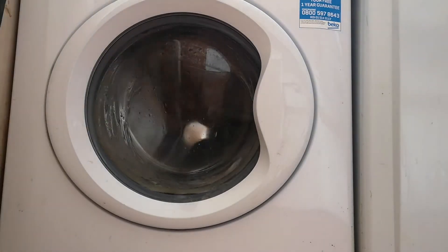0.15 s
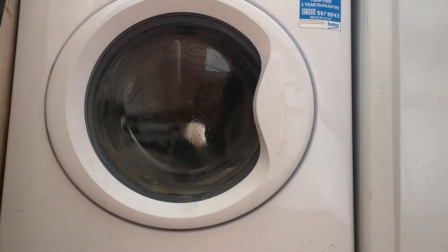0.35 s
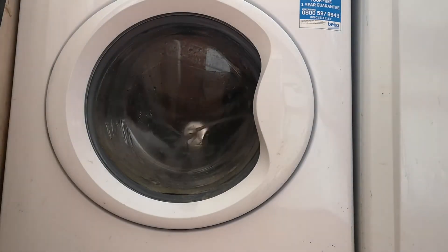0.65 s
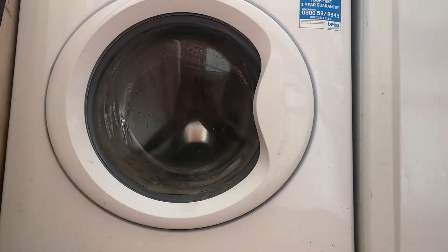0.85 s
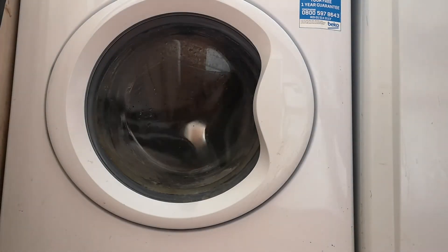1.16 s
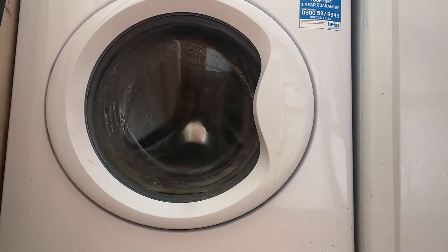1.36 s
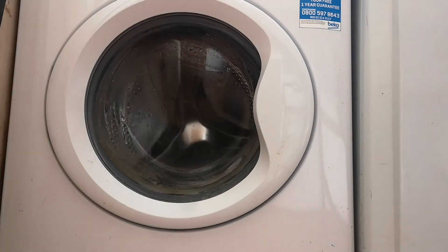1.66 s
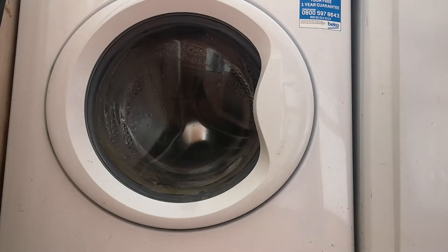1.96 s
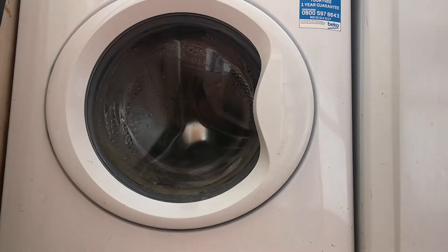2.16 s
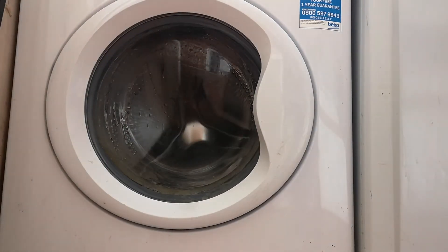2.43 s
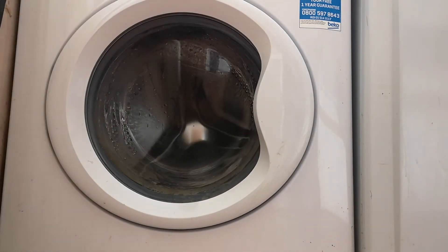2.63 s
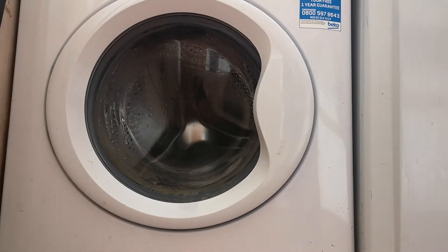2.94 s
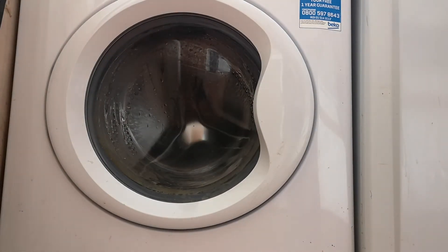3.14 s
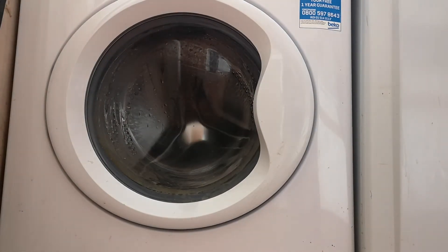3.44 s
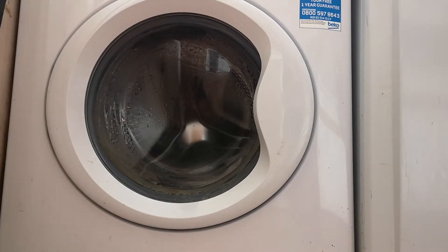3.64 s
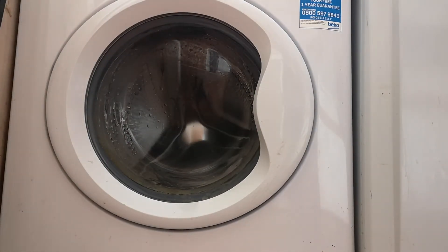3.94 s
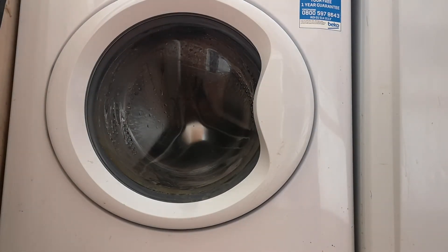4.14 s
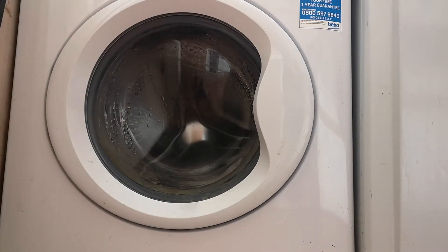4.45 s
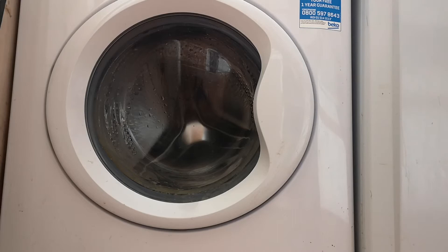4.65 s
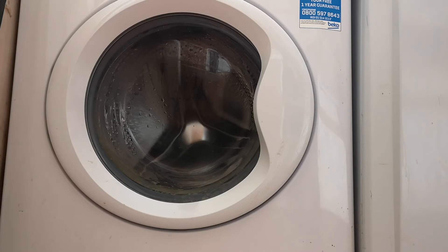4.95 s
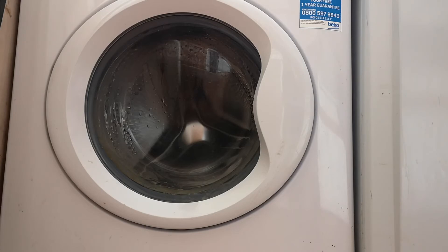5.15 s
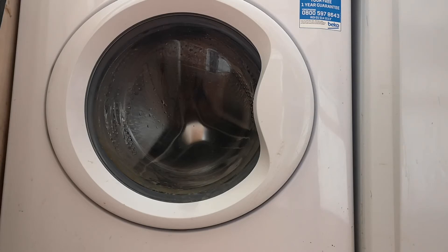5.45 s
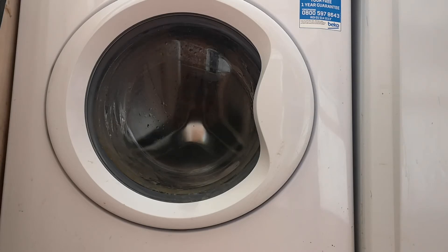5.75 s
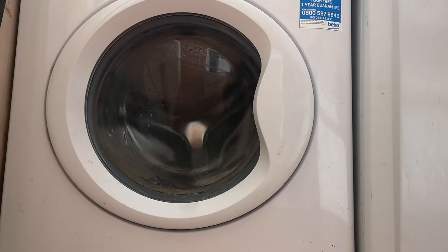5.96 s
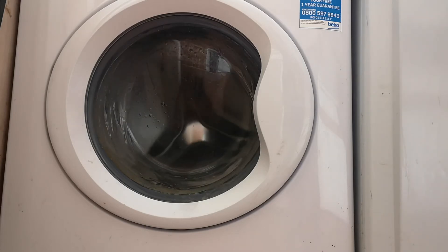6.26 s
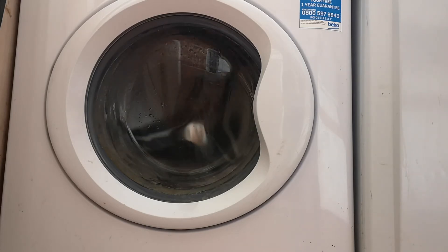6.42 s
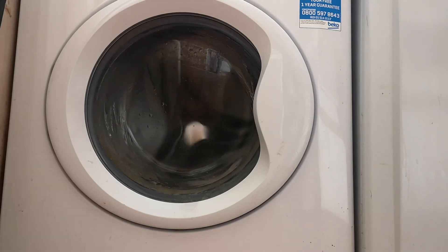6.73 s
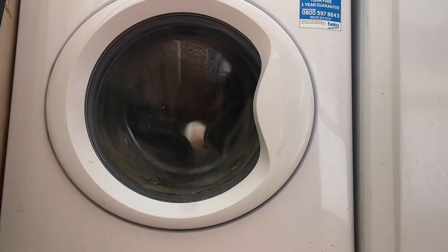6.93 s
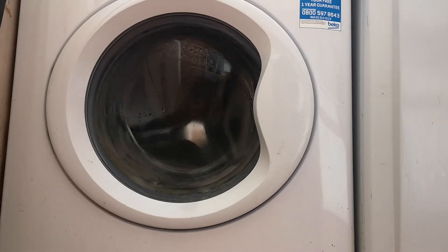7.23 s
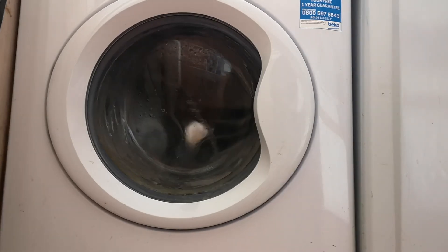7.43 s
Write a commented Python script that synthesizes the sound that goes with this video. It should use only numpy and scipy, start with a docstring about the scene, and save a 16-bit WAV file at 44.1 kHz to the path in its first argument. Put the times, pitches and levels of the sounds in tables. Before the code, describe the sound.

Close washing machine: pulsing motor boom and hiss, hard knocks in the drum, a coasting stop, near silence, a lurch, then harsh squeal and steady turning again.

```python
"""A washing machine motor turns its drum, coasts to a stop, rests and starts up the other way.
Each shaft turn is an impulse on the cabinet, whose modes boom; the brushes make noise that swells and ticks.
Under strain, stick-slip noise sings in the housing resonances. Loose things knock in the drum as damped sines.
The tub sways and lurches on its springs; a hum of steady harmonics and the hush of the home fill the rest."""
import sys
import numpy as np
from scipy import signal
from scipy.io import wavfile
from scipy.ndimage import uniform_filter1d

SR = 44100
rng = np.random.default_rng(int(sys.argv[2]) if len(sys.argv) > 2 else 0)


def to_linear_factor(level_db):
    """Convert decibel levels (scalar or array-like) to linear amplitude factors."""
    exponent = np.asarray(level_db, float) / 20
    return 10 ** exponent


def put_to_file(sound):
    """Save the sound as 16-bit audio at rate SR, in the file named by the first command-line argument."""
    columns = np.atleast_2d(sound).T  # one column per channel
    safe = np.clip(columns, -1, 1)
    whole_steps = np.round(safe * 32767)
    wavfile.write(sys.argv[1], SR, whole_steps.astype(np.int16))


N = 334719
TIME = np.arange(N) / SR

REVERSE_S = 3.7   # within the rest: settings for turning forward hold before it, for turning back after it
FIRST_JOLT_S = 4.364   # the motor starts backwards
STEADY_HZ, STEADY_DB = (270, 330), -43   # tones and panels in this range stop growing above this load


def rms_one(x):
    """Normalization: scales to unit rms."""
    return x / np.sqrt(np.mean(x ** 2) + 1e-20)


def at_hz(points, hz):
    """Spectral envelope: interpolates levels linearly over log frequency."""
    point_hz, value = np.transpose(points)
    return np.interp(np.log(hz), np.log(point_hz), value)


def drift(rate_hz):
    """Low-pass noise: two equal poles at the given rate make a slow random curve of spread 1."""
    hop = 40   # samples between the points of the slow curve
    r = np.exp(-2 * np.pi * rate_hz * hop / SR)
    white = rng.standard_normal(N // hop + 2002)
    slow = signal.lfilter([1], [1, -2 * r, r * r], white)[2000:]
    return np.interp(np.arange(N) / hop, np.arange(len(slow)), rms_one(slow))


def resonate(x, hz, width_hz):
    """Damped resonance: a pole pair of gain 1 at its peak."""
    r = np.exp(-np.pi * width_hz / SR)
    zeros = [(1 - r * r) / 2, 0, (r * r - 1) / 2]
    poles = [1, -2 * r * np.cos(2 * np.pi * hz / SR), r * r]
    return signal.lfilter(zeros, poles, x + 1e-18)


def resonate_twice(x, hz, width_hz, second):
    """Cascaded resonance: a second stage, its width scaled by the given factor, steepens the skirts."""
    return resonate(resonate(x, hz, width_hz), hz, second * width_hz)


def wandering(cycles, width_hz):
    """Phase diffusion: two unrelated sines of rms 1 whose random-walk phases spread the line to a width."""
    steps = rng.standard_normal((2, N // 16 + 2)) * np.sqrt(32 * np.pi * width_hz / SR)
    walk = np.repeat(np.cumsum(steps, axis=1), 16, axis=1)[:, :N]
    return np.sqrt(2) * np.sin(2 * np.pi * cycles + walk)


# Interchannel coherence. Each row: frequency in Hz, correlation of left with right.
LIKENESS = [(60, 1.0), (180, 0.98), (550, -0.4), (1650, -0.06), (4970, 0.09), (15000, -0.0)]
# Interchannel balance. Each row: frequency in Hz, left over right in dB.
BALANCE = [(60, 0.0), (180, 0.0), (550, -0.5), (1650, -0.5), (4970, 0.0), (9000, -2.5), (12000, -8.0),
           (15000, -12.0)]


def placed(pair, hz):
    """Mid-side synthesis: two signals become left and right with the coherence and balance of their pitch."""
    alike = np.clip(at_hz(LIKENESS, hz), -1, 1)
    lean_db = at_hz(BALANCE, hz) / 2
    mid, side = np.sqrt(1 + alike) * pair[0], np.sqrt(1 - alike) * pair[1]
    return (mid + side * [[1], [-1]]) * to_linear_factor(np.array([[lean_db], [-lean_db]]))


def banded_noise(spectrum, patchy_db, beat_db=0, step=1 / 3):
    """Filter-bank noise of rms 1: bands of step octaves flicker singly and in part together."""
    out, together = 0, drift(1.05)
    bottom_hz, top_hz = spectrum[0][0], spectrum[-1][0]
    edges = bottom_hz * 2 ** np.arange(0, np.log2(top_hz / bottom_hz) + step, step)
    white = rng.standard_normal((2, 2, N))
    for k, (low, high) in enumerate(zip(edges, np.minimum(edges[1:], 19000))):
        band_filter = signal.butter(2, [low, high], "band", fs=SR, output="sos")
        band = signal.sosfilt(band_filter, white[k % 2])
        hz = np.sqrt(low * high)
        bite = np.clip(np.log2(hz / 400) / 4, 0, 1)   # the beat bites deeper in the treble
        flicker_db = patchy_db * (0.45 * together + drift(15.3))
        out = out + to_linear_factor(at_hz(spectrum, hz) + flicker_db + bite * beat_db) * placed(band, hz)
    return rms_one(out)


def by_direction(forward, back):
    """Piecewise setting: one value while turning forward, another while turning back."""
    return np.where(TIME < REVERSE_S, forward, back)


def turning(turns, full_speed, power, smooth):
    """Speed-dependent excitation: grows from 0 at rest to 1 at full_speed (turns per s)."""
    share = np.clip(np.gradient(turns) * SR / full_speed, 0, 1)
    return uniform_filter1d(share ** power, size=smooth)


def peaks_db(rows, rise_db_per_s):
    """Exponential envelopes: the loudest of several (start s, hold s, dB, fade dB per s) at each moment."""
    shapes = []
    for start, hold, db, fade in rows:
        before, after = (start - TIME).clip(0), (TIME - start - hold).clip(0)
        shapes.append(db - rise_db_per_s * before - fade * after)
    return np.max(shapes, axis=0)


def shaft():
    """Rotational kinematics: steady speed, uniform braking, rest, then an exponential run-up backwards."""
    start_turns, speed, off_s, braking = .54, 15.37, 2.33, 22   # turns, turns per s, s, turns per s per s
    coast = np.clip(TIME - off_s, 0, speed / braking)
    forward = start_turns + speed * (np.minimum(TIME, off_s) + coast) - braking * coast ** 2 / 2
    speed, lost_turns, rise_s = 15.5, 1.15, .14   # turns per s, turns lost in the run-up, its time constant
    since = np.maximum(TIME - FIRST_JOLT_S, 0)
    whole = np.ceil(forward[-1])   # the run-up begins on a whole turn
    back = whole + speed * since - lost_turns * (1 - np.exp(-since / rise_s))
    return np.where(TIME < FIRST_JOLT_S, forward, back)


def brush_beat(turns, depth_db, tick_db, jump):
    """Periodic modulation, level over one turn: a round swell, in part a fading jump, and three short ticks."""
    angle = turns % 1
    strength = np.array([1, .6, .3])[(3 * angle).astype(int)]   # the first tick is the strongest
    ticks = np.exp(-(3 * angle % 1) / 0.034) * strength
    uneven = np.clip(1 + 0.4 * drift(23.5), 0, 2)
    swell = jump * (.5 - angle) + (1 - jump) * np.cos(2 * np.pi * (angle - 0.03)) / 2
    beat_db = depth_db * swell + tick_db * ticks * uneven
    return uniform_filter1d(beat_db, size=150)   # the room rounds each jump


# Cabinet modes. Each row: frequency in Hz, width in Hz, level turning forward in dB, level turning back in dB.
CABINET_MODES = [(46, 8, -10, -14), (62, 10, -5, -5), (77, 10, -2, -4), (92, 10, -2, -1), (108, 10, -3, -5),
                 (124, 10, -11, -13), (139, 10, -17, -19), (154, 10, -11, -17), (170, 10, -8, -14),
                 (185, 10, -16, -23), (200, 12, -24, -38), (231, 10, -33, -35), (262, 30, -37, -34),
                 (345, 70, -46, -39), (292, 12, -32, -40), (308, 10, -27, -24)]
# Rumble of moving water. Each row: frequency in Hz, level in dB per Hz.
WATER_RUMBLE = [(42, -15), (62, -2), (100, 6), (140, -8), (200, -21), (260, -48)]


def boom(turns, boom_db, lurch_db, load_db):
    """Modal excitation: each uneven jolt of the shaft rings the cabinet modes, over a rumble of moving water."""
    uneven, out = to_linear_factor(.7 * drift(8.0)), 0
    for hz, width_hz, forward_db, back_db in CABINET_MODES:
        # higher panels are shaken at ever earlier shaft angles, so each thump sweeps downward;
        # above 270 Hz all share one lead
        lead_turns = .00175 * hz if hz < 270 else .57
        # the lowest mode is pushed the opposite way when the shaft turns forward
        push = by_direction(-uneven, uneven) if hz < 50 else uneven
        jolts = np.diff(np.floor(turns - .57 + lead_turns), prepend=0).clip(0, 1) * push
        level_db = by_direction(forward_db, back_db) + 1.3 * drift(2.0)
        if hz > 190:   # these panels follow the load on the drive alone, not the lurches of the tub
            level_db = level_db - lurch_db
        if STEADY_HZ[0] < hz < STEADY_HZ[1]:
            level_db = level_db - (load_db - STEADY_DB).clip(0)
        ring = resonate_twice(jolts * to_linear_factor(level_db), hz, width_hz, 2)
        # a copy delayed by 97 samples serves as side signal and widens the stereo
        out = out + placed([ring, np.roll(ring, 97)], hz)
    rumble_db = np.where(TIME < FIRST_JOLT_S, -9.5, -5.5)   # against the boom
    rumble = to_linear_factor(rumble_db) * banded_noise(WATER_RUMBLE, patchy_db=1.0, step=0.5046)
    return to_linear_factor(boom_db) * (turning(turns, 3, 1, 600) * rms_one(out) + rumble)


# Thin motor tones. Each row: frequency in Hz, level against the hiss in dB turning forward, then turning back.
MOTOR_TONES = [(301, -18, -20), (409, -25, -19), (572, -21, -22), (682, -26, -22), (829, -24, -21)]


def motor_tones(turns, load_db):
    """Narrow-band tones: phase diffusion blurs tones of fixed pitch, which fade as the shaft slows."""
    out = 0
    for hz, forward_db, back_db in MOTOR_TONES:
        steady = STEADY_HZ[0] < hz < STEADY_HZ[1]
        drive_db = np.minimum(load_db, STEADY_DB) if steady else load_db
        level_db = by_direction(forward_db, back_db) + drive_db + 2.5 * drift(3.0)
        out = out + to_linear_factor(level_db) * placed(wandering(hz * TIME, width_hz=5), hz)
    return turning(turns, 9, 1, 2000) * out


# Harmonics of the hum. Each row: multiple of the fundamental, level in dB.
HUM_HARMONICS = [(1, 3), (2, -0.5), (3, -6.5), (4, -14), (5, -27), (6, -28.5), (7, -31), (8, -36.5),
                 (9, -24), (10, -28.5)]


def hum(turns, boom_db):
    """Beating and harmonic series: the tub sways at two close rates and shakes, over a steady wavering hum."""
    hum_hz, hum_db = 30.8, -46.5
    swell_turns = 21.1   # shaft turns from one top of the sway's swell to the next
    top_turn = by_direction(.8, 13.0)   # shaft turn of a top
    twice_a_turn = 4 * np.pi * turns
    sway = np.sin(twice_a_turn) + np.sin(twice_a_turn - 2 * np.pi * (turns - top_turn) / swell_turns)
    shaken = rms_one(resonate(resonate(rng.standard_normal(N), 29.2, 4.0), 52.0, 23))
    out = to_linear_factor(boom_db) * (to_linear_factor(-10.5) * turning(turns, 15, 2, 2000) * sway + to_linear_factor(-15) * shaken)
    for multiple, level_db in HUM_HARMONICS:
        wave = np.sin(2 * np.pi * multiple * hum_hz * TIME + multiple ** 2)
        out = out + to_linear_factor(hum_db + level_db + 3.0 * drift(3.0)) * wave
    return np.sqrt(2) * out


# Hiss of brushes and water. Each row: frequency in Hz, level in dB per Hz.
HISS_SPECTRUM = [(200, -12), (380, -5), (650, -2), (1390, -2.5), (1910, 1), (4400, -9.5), (5680, -14),
                 (6570, -12.5), (12300, -17), (14800, -30.5), (15600, -40)]
# Broad housing rings. Each row: frequency in Hz, width in Hz, level against the hiss in dB.
HOUSING_RINGS = [(1905, 75, -16), (2470, 900, -15), (5573, 850, -7.5), (7340, 520, -18), (9190, 130, -27.5)]


def brush_hiss(beat_db, hiss_db):
    """Amplitude-modulated noise: broad hiss beats with the shaft, and the motor housing resonates with it."""
    out = banded_noise(HISS_SPECTRUM, patchy_db=1.38, beat_db=beat_db)
    white = rng.standard_normal((2, N))
    for hz, width_hz, level_db in HOUSING_RINGS:
        ring = resonate_twice(white * to_linear_factor(1.17 * beat_db), hz, width_hz, 1)
        out = out + to_linear_factor(level_db + .7 * drift(6.0)) * placed(rms_one(ring), hz)
    return to_linear_factor(hiss_db) * out


# Hush of the home. Each row: frequency in Hz, level in dB per Hz.
HUSH_SPECTRUM = [(190, -39), (330, -2), (926, -12), (1040, -18), (1530, -1.5), (3420, -16), (15600, -36)]


def home_hush():
    """Stationary background noise: a shaped spectrum at a constant -61.5 dB rms."""
    return to_linear_factor(-61.5) * banded_noise(HUSH_SPECTRUM, patchy_db=.6, step=.5)


# Knocks in the drum. Each row: start in seconds, level of the blow in dB, frequency in Hz,
# left over right in dB, time for the rattling tail to fall 60 dB in seconds.
DRUM_KNOCKS = [(0.9625, -29, 1130, -10, 0.16), (0.967, -37, 1800, -7, .15), (0.984, -36, 1180, 6, 0.25),
               (1.5855, -38, 2400, -8, 0.2), (1.5875, -33, 1900, -5, .2), (1.595, -36, 1750, 1, 0.18),
               (1.6815, -22, 2650, 2.5, 0.29), (1.6835, -27, 3000, 2, .35), (1.687, -32, 2650, 0, .3),
               (2.014, -34, 2300, -1, 0.069), (2.0825, -30, 890, -10, 0.19), (2.091, -30, 980, -5, 0.32),
               (2.61, -53, 12300, -6, .1), (6.706, -42, 950, -13, 0.5)]


def knocks():
    """Impact and decay: a blow rings as a damped sine with a crack, then a rough tail dies away in the drum."""
    out = np.zeros((2, N))
    after = np.arange(int(.25 * SR)) / SR
    for s, level_db, hz, pan_db, t60 in DRUM_KNOCKS:
        white = rng.standard_normal((2, len(after)))
        blow = np.sin(2 * np.pi * hz * after) * to_linear_factor(-60 * after * hz / 40)   # 40 cycles to -60 dB
        rough = rms_one(resonate(resonate(white, 1.07 * hz, .5 * hz), 0.87 * hz, 0.33 * hz))
        # the rattle holds for 0.05 of its t60, then decays
        tail = rough * to_linear_factor(-14.5 - 60 * np.maximum(after / t60 - 0.05, 0))
        # the crack follows half of the blow's dB
        crack_db = -26 + .5 * level_db - 60 * after / 0.025
        crack = rms_one(resonate(white, min(0.84 * hz, 12000), 2100)) * to_linear_factor(crack_db)
        sides = to_linear_factor(np.array([[pan_db], [-pan_db]]) / 2)
        knock = sides * (to_linear_factor(level_db) * (blow + tail) + crack)
        at = round(s * SR)
        out[:, at:at + len(after)] += knock[:, :N - at]
    return out


# Housing resonances. Each row: frequency in Hz, width in Hz, then levels in dB coasting down, at rest,
# at the first jolt, on the first turns, gathering speed, up to speed, settling.
SQUEAL_MODES = [(730, 40, -19, -30, -30, -30, -30, -30, -30), (1906, 80, -25, -25, -12, -13, -14, -15, -15),
                (2240, 140, -25, -25, -5, -1, -10, -7, -12), (2729, 60, -25, -25, -10, -10, -11, -11, -15),
                (3615, 100, -25, -25, -11, -8, -12, -9, -15), (4240, 140, -25, -25, 0, -5, -9, -11, -16),
                (5580, 60, 3, -6, -2, 1, 3, 4, 3), (6250, 60, -20, -20, -6, -11, -2, -11, -6),
                (7125, 65, -8, -2, -5, -5, -7, -5, -13), (10590, 70, -10, -8, -12, -12, -12, -13, -17),
                (12390, 45, -35, -35, -26, -24, -20, -20, -18),
                (14345, 70, -32, -32, -30, -18, -18, -20, -22)]
# Each entry: time of one of those seven stages in seconds.
STAGES_S = [2.95, 3.2, 4.38, 4.5, 4.68, 4.95, 5.14]
# Each entry: level of the rasp at one stage in dB.
RASP_DB = [-3, -3, -3, -3, -3, -3, -9]
# Rasp under strain. Each row: frequency in Hz, level in dB per Hz.
RASP_SPECTRUM = [(1500, -20.5), (2500, 3.5), (5000, 4.5), (8000, -3), (12000, -3.5), (15500, -27)]
# Bursts of squeal. Each row: start in seconds, hold in seconds, level in dB, fade in dB per second.
SQUEAL_BURSTS = [(2.44, .05, -59, 60), (2.54, .05, -55, 120), (2.645, 0.055, -52, 170),
                 (2.785, 0.06, -55, 110), (3.25, 0.08, -72, 150), (4.366, 0.021, -46, 74),
                 (4.466, 0.635, -43.5, 500), (5.155, .025, -48, 400), (5.215, 0.05, -48, 80),
                 (5.55, .02, -55, 120)]
BURST_RISE_DB_PER_S = 1500


def squeal(beat_db):
    """Stick-slip friction: narrow housing resonances sing and rustle, each coming and going, over a bright rasp."""
    white, out = rng.standard_normal((2, N)), 0
    for hz, width_hz, *stage_db in SQUEAL_MODES:
        rustle = rms_one(resonate_twice(white, hz, width_hz, 3))
        line = .6 * rustle + .8 * wandering(hz * TIME, .4 * width_hz)
        flicker_db = 1.0 * drift(4.0) + 1.5 * drift(18.0)
        level_db = np.interp(TIME, STAGES_S, stage_db) + flicker_db + .6 * beat_db
        out = out + to_linear_factor(level_db) * placed(line, hz)
    rasp = banded_noise(RASP_SPECTRUM, patchy_db=1.5, beat_db=beat_db, step=.5)
    rasp = to_linear_factor(np.interp(TIME, STAGES_S, RASP_DB)) * rasp
    return to_linear_factor(peaks_db(SQUEAL_BURSTS, BURST_RISE_DB_PER_S)) * (out + rasp)


# The tub on its springs. Each row: frequency in Hz, width in Hz, level against the rocking or lurch in dB.
SPRING_MODES = [(30, 7.5, 1.5), (59, 5.1, -1.5)]


def lurch(level_db):
    """Mass-spring resonance: the tub bounces on its springs as low, narrow noise."""
    out = 0
    for hz, width_hz, db in SPRING_MODES:
        bounce = rms_one(resonate_twice(rng.standard_normal(N), hz, width_hz, 2))
        out = out + to_linear_factor(level_db + db) * bounce
    return out


def whine():
    """Narrow-band resonance: noise in one resonance swells after the restart and sinks away."""
    hz, width_hz = 1330, 35
    line = rms_one(resonate_twice(rng.standard_normal((2, N)), hz, width_hz, 3))
    return to_linear_factor(peaks_db([(4.95, .4, -54, 6)], rise_db_per_s=30)) * placed(line, hz)


# Load on the drive. Each row: time in seconds, load as the level of the brush hiss in dB.
DRIVE_LOAD = [(0, -43.5), (2.18, -44), (2.58, -46), (2.7, -51), (2.73, -56), (2.78, -59.5), (2.8, -51.5),
              (2.99, -64), (3.11, -110), (4.34, -64), (4.37, -48), (4.45, -47), (4.48, -40), (4.8, -36.5),
              (5.31, -40), (6.0, -41.5), (7.3, -42.5)]
# The resting tub rocks. Each row: time in seconds, level of the boom in dB.
TUB_ROCKS = [(3.39, -41.5), (3.95, -43.5), (4.16, -34.5)]


def scene():
    """Superposition: one shaft angle and one load drive the machine's sources, summed with the home's hush."""
    turns = uniform_filter1d(shaft(), size=300)
    load_db = np.interp(TIME, *np.transpose(DRIVE_LOAD))
    fall_db_per_s = 52.5
    rock_db = peaks_db([(s, 0, db, fall_db_per_s) for s, db in TUB_ROCKS], rise_db_per_s=101)
    # the tub lurches at the first jolt backwards
    kick_db = peaks_db([(FIRST_JOLT_S, 0.01, -23.5, fall_db_per_s)], BURST_RISE_DB_PER_S)
    driven_db = load_db + 16   # the boom lies 16 dB above the hiss
    boom_db = np.max([driven_db, rock_db, kick_db], axis=0)
    hiss_db = np.maximum(load_db, rock_db - 30.5)
    beat_db = brush_beat(turns, depth_db=4.5, tick_db=9.5, jump=0.67)
    slip_db = brush_beat(turns, depth_db=6.0, tick_db=3.0, jump=1)
    machine = boom(turns, boom_db, boom_db - driven_db, load_db) + motor_tones(turns, load_db)
    machine = machine + hum(turns, boom_db) + brush_hiss(beat_db, hiss_db) + knocks()
    machine = machine + squeal(slip_db) + lurch(np.maximum(rock_db, kick_db)) + whine()
    return machine + home_hush()


def top_cut(x):
    """Nothing passes above the cut-off."""
    return signal.sosfilt(signal.butter(12, 15730, fs=SR, output="sos"), x)


def record(dry):
    """Band limitation: a low-pass cuts the top, and the sound breaks off just before the end."""
    low_pass = signal.cheby2(8, 40, 15800, fs=SR, output="sos")
    end_s, ramp_s = 7.49, 0.00089
    mix = signal.sosfilt(low_pass, dry) * np.clip((end_s - TIME) / ramp_s, 0, 1)
    return top_cut(mix)


dry = scene()
out = record(dry)
put_to_file(out)
```